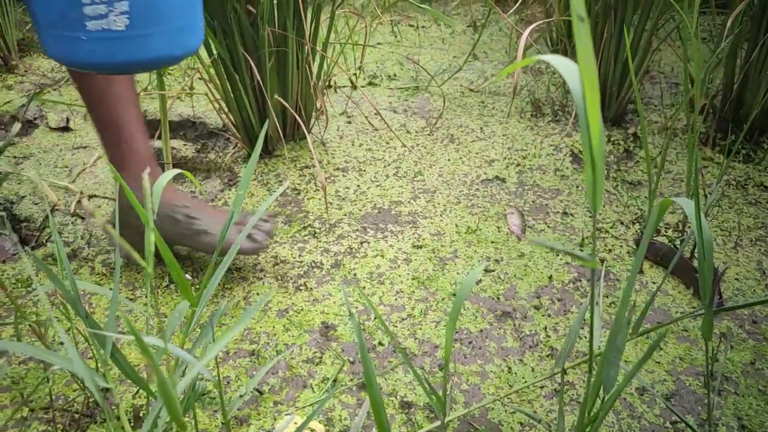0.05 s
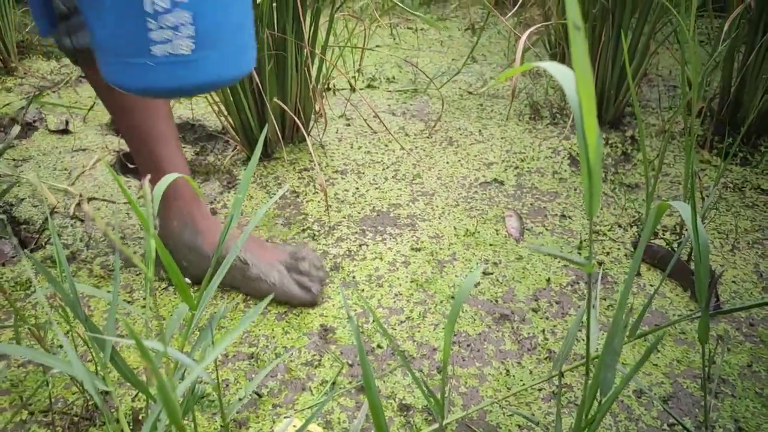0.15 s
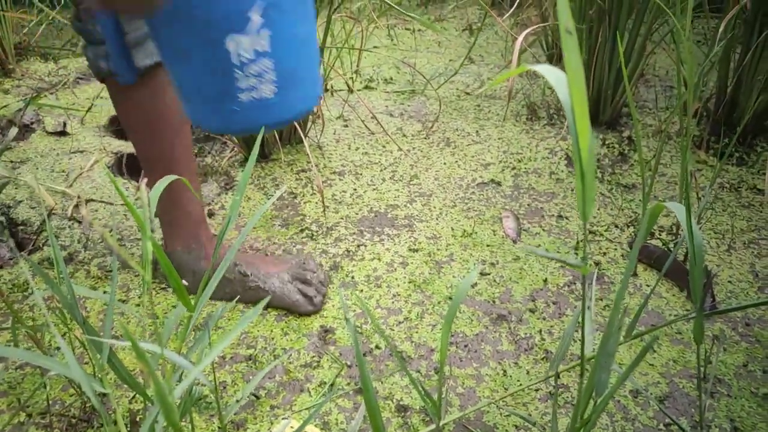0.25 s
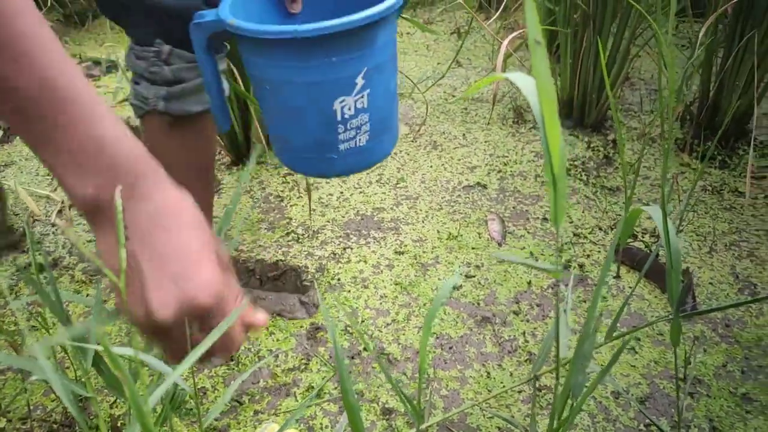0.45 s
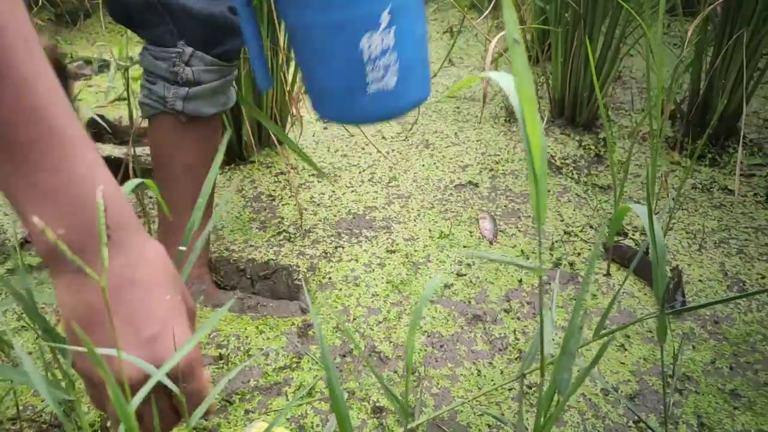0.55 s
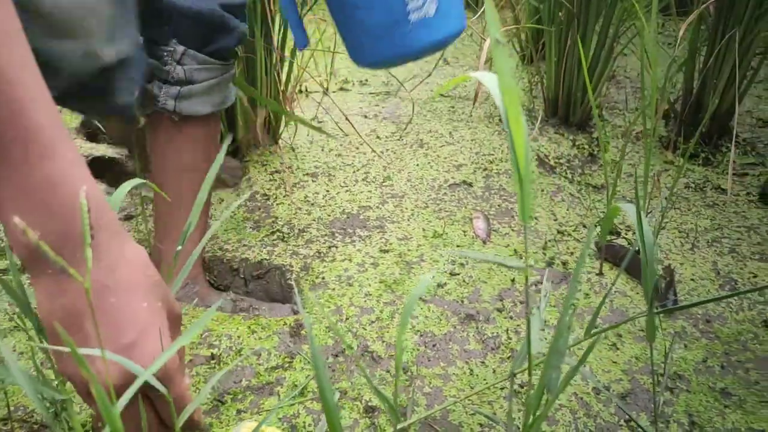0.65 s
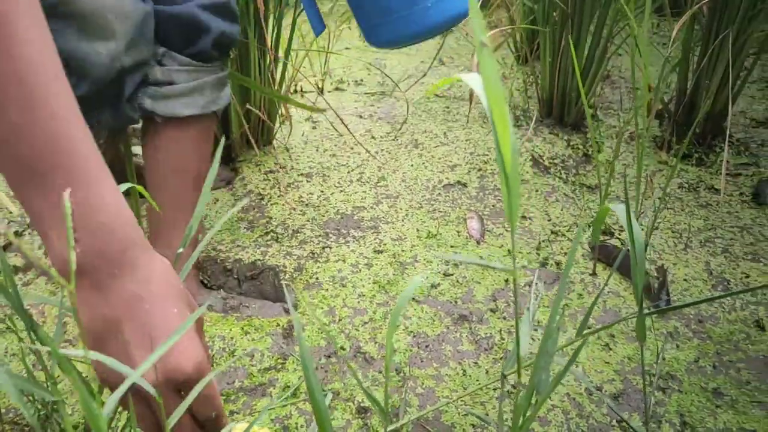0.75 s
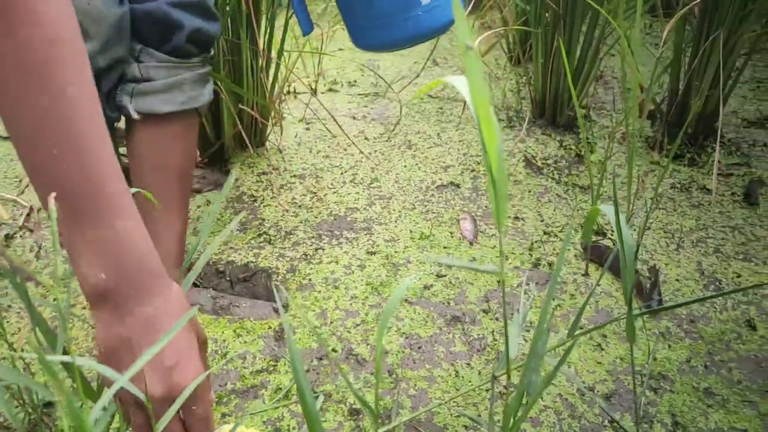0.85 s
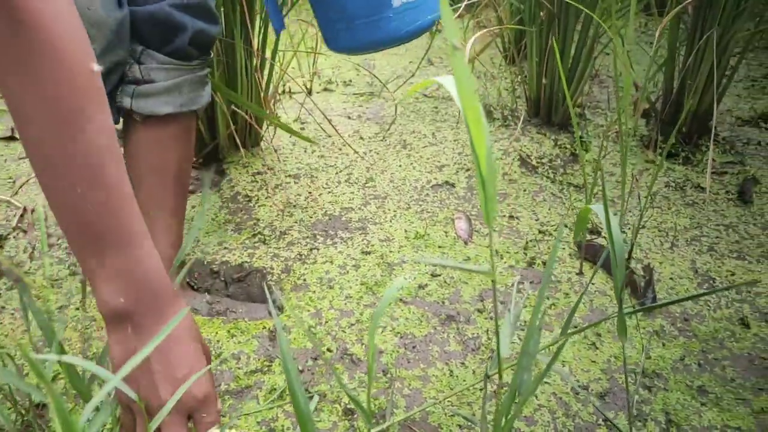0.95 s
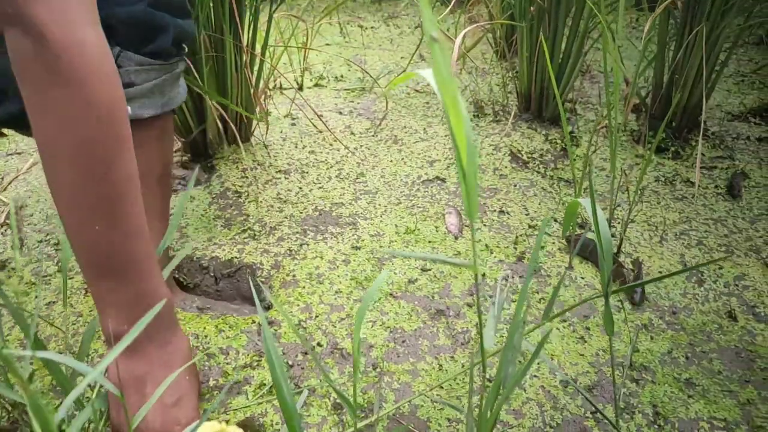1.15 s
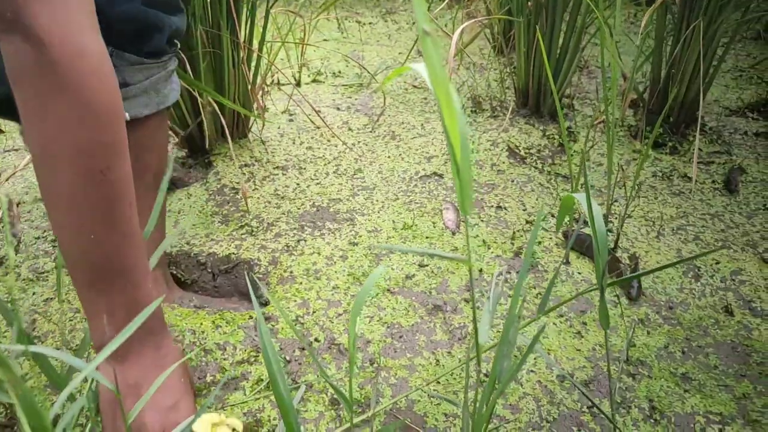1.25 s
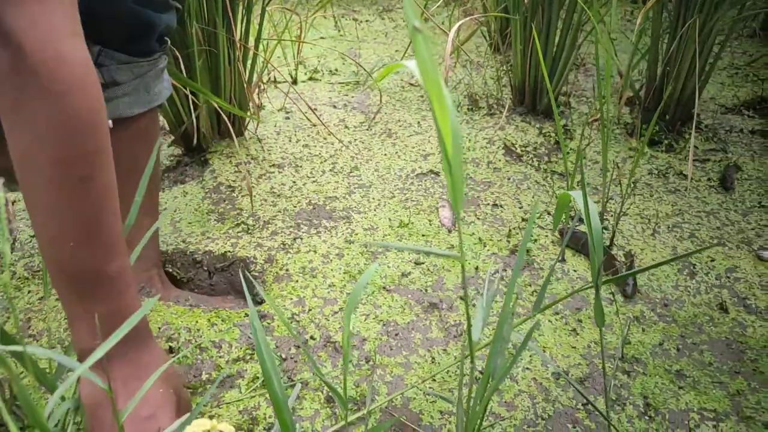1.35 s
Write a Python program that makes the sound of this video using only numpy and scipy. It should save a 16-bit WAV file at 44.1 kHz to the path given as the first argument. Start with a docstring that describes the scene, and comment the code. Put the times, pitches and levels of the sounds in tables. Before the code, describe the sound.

Wet, crackly squelches sound close by as someone steps through marsh mud and weed. A plastic bucket knocks once, then come small plops and a sharp snap of stalks, followed by softer crackles. An insect chirps faintly outdoors.

```python
"""A low rumble of air and a faint hiss open the scene, with an insect chirping steadily over them.
Someone wades barefoot through a weedy marsh with a plastic bucket and reaches down among the reeds.
Wet weed crackles as tiny bubbles burst, and stalks snap under foot and hand. The bucket is knocked
once and rings, air pockets plop in the mud, and the soft ground thuds under the wader's weight."""
import sys
import numpy as np
from scipy import signal
from scipy.fft import rfft, irfft
from scipy.io import wavfile

SR = 44100
rng = np.random.default_rng(int(sys.argv[2]) if len(sys.argv) > 2 else 0)


def transcribe(signal):
    """Save signal, clipped to [-1, 1], as a 16-bit WAV file at the path in sys.argv[1]."""
    frames = np.atleast_2d(signal).T
    limited = np.clip(frames, -1, 1)
    pcm = np.round(limited * 32767).astype(np.int16)
    wavfile.write(sys.argv[1], SR, pcm)


N = 61739
T = np.arange(N) / SR


def from_db(db):
    """Turn decibels into a number to multiply a sound by."""
    return 10 ** (np.asarray(db) / 20)


def unit_level(sound):
    """Scale a sound so that its average (RMS) level is 1."""
    return sound / np.sqrt(np.mean(sound ** 2) + 1e-20)


def band_noise(edges_hz, order=3):
    """Noise between a low and a high frequency, at level 1."""
    band = signal.butter(order, edges_hz, "band", fs=SR, output="sos")
    return unit_level(signal.sosfilt(band, rng.standard_normal(N)))


def shaped_noise(shape):
    """Noise at level 1, made stronger or weaker at each frequency as the shape says."""
    hz, db = np.transpose(shape)
    all_hz = np.maximum(np.fft.rfftfreq(N, 1 / SR), 1)
    gains = from_db(np.interp(np.log(all_hz), np.log(hz), db))
    return unit_level(irfft(rfft(rng.standard_normal(N)) * gains, N))


def burst(start, rise_s, fade_s):
    """A loudness curve that swells quickly and dies away, dropping 60 dB in the fade time."""
    age = np.maximum(T - start, 0)
    swell = 1 - np.exp(-(age / rise_s) ** 2)
    return swell * np.exp(-np.minimum(np.log(1000) * age / fade_s, 100))


def ring(start, hz, rise_s, fade_s):
    """One pure note that swells and dies away."""
    return burst(start, rise_s, fade_s) * np.sin(2 * np.pi * hz * (T - start))


# The tone of the air's rumble and of its hiss: (frequency [Hz], relative level [dB])
RUMBLE_SHAPE = [(15, -13.5), (25, 3), (45, -10.5), (65, -4.5), (90, -1), (120, -9.5), (170, -14.5),
                (260, -24.5), (400, -32), (800, -61)]
HISS_SHAPE = [(150, -14), (400, 7.5), (950, 7), (1700, -9), (2500, 4.5), (3300, -5), (5400, -2), (6900, 2),
              (7600, 8), (8300, -6.5)]

def air():
    """The air over the open marsh makes a steady low rumble and a faint hiss."""
    return from_db(-52.5) * shaped_noise(RUMBLE_SHAPE) + from_db(-68) * shaped_noise(HISS_SHAPE)


# How loud the wet weed crackles as time goes by: (time [s], level [dB])
CRACKLE_LEVELS = [(0, -70.5), (.19, -74.5), (.24, -65), (.45, -62), (.50, -56), (.55, -59.5), (.63, -63),
                  (.78, -62.5), (.86, -66.5), (1.0, -71.5), (1.15, -69), (1.30, -69), (1.35, -64.5),
                  (1.4, -71)]

def weed_crackle(pops_per_s=5000, fade_cycles=8, boost_db_per_octave=1.5):
    """Tiny bubbles and films of water burst at random in the stirred weed, each with a very short note."""
    sizes = from_db(0.5 * np.minimum(rng.exponential(1, N), 4)) * rng.choice([-1, 1], N)
    clicks = sizes * (rng.random(N) < pops_per_s / SR)
    pitches_hz = np.geomspace(453, 7200, 24)
    pitch_choice = rng.integers(0, len(pitches_hz), N)
    crackle = np.zeros(N)
    for k, hz in enumerate(pitches_hz):
        step = 2 * np.pi * hz / SR
        decay = np.exp(-np.log(1000) * hz / (fade_cycles * SR))
        # this filter turns each click into a short fading note
        feedback = [1, -2 * decay * np.cos(step), decay * decay]
        pops = signal.lfilter([0, np.sin(step)], feedback, clicks * (pitch_choice == k) + 1e-18)
        crackle += from_db(boost_db_per_octave * np.log2(hz / pitches_hz[0])) * unit_level(pops)
    level_db = np.interp(T, *np.transpose(CRACKLE_LEVELS))
    return unit_level(crackle) * from_db(level_db)


# When each of the insect's chirps begins: (time [s])
CHIRP_STARTS = [0.027, 0.122, 0.206, 0.291, 0.386, 0.476, 0.561, 0.648, 0.741, 0.829, 0.927, 1.013, 1.112,
                1.196, 1.286, 1.375]

def insect(chirp_s=0.044, ramp_s=0.008):
    """An insect repeats a thin, high chirp about eleven times a second."""
    on_off = sum(np.clip(np.minimum(T - start, start + chirp_s - T) / ramp_s, 0, 1)
                 for start in CHIRP_STARTS)
    note = band_noise((7530, 7770), order=2)  # so narrow that it sounds like one pitch
    faint_upper_band = from_db(-10) * band_noise((7500, 8500))  # a faint high hiss with each chirp
    return from_db(-62.5) * on_off * (note + faint_upper_band)


# Wet stalks snapping: (time [s], fade time [s], low noise level [dB], middle noise level [dB],
# high noise level [dB], ring pitch [Hz], ring level [dB])
STALK_SNAPS = [(.0885, 0.012, -66, -56.5, -52, 6000, -60), (.3080, 0.018, -74, -57, -71, 6900, -50),
               (.3730, 0.016, -52.5, -76, -72, 2670, -51), (0.4585, 0.0045, -68, -58, -34.5, 2700, -45),
               (0.4648, 0.0095, -33.5, -53, -32, 2670, -25.5), (.4672, 0.019, -61, -54, -61, 2126, -30),
               (0.4699, 0.045, -36.5, -44.5, -48, 2834, -32.5),
               (0.4735, 0.0087, -30, -40, -33, 6910, -15.5), (0.4784, .013, -29.5, -32, -34.5, 6700, -29),
               (.4845, 0.016, -42, -40.5, -38, 2680, -45), (0.4888, 0.011, -59, -38, -54, 7000, -31),
               (.5335, 0.023, -68, -51, -49.5, 6920, -46), (.5365, 0.009, -51, -65, -69, 2140, -46),
               (.5720, 0.046, -52, -45.5, -49.5, 6080, -47), (0.5781, 0.011, -72, -40.5, -50, 2780, -38),
               (.6170, 0.011, -51.5, -53, -53, 2200, -53), (.6945, 0.02, -50.5, -49, -50.5, 2900, -56),
               (.7560, 0.094, -50, -76, -63, 2520, -58), (.7625, 0.046, -64, -51.5, -65, 3520, -57),
               (0.7957, 0.017, -45.5, -49, -55, 2126, -42), (.7986, 0.012, -43, -46, -53, 3440, -45),
               (.8000, 0.013, -56, -42, -48, 4800, -37), (.8020, 0.025, -60, -56, -73, 4250, -40),
               (0.807, 0.03, -59, -52, -64, 3860, -58), (.9432, 0.0051, -40, -48, -70, 1700, -33),
               (1.100, 0.012, -71, -55, -55, 6740, -47.5), (1.1930, 0.021, -79, -63, -56, 7160, -52.5),
               (1.2200, 0.042, -80, -63, -58, 6900, -56), (1.3150, 0.031, -57, -58, -78, 2820, -50.5),
               (1.3249, 0.0077, -49.5, -36.5, -58, 2950, -31), (1.3266, 0.0074, -56, -56, -70, 3580, -40.5),
               (1.3281, 0.04, -66, -49, -69, 2350, -60), (1.3450, 0.033, -52, -56.5, -58, 5000, -53.5)]

def stalk_snaps():
    """Each stalk tears with a short burst of noise and rings briefly at its own pitch."""
    treble_cut = signal.butter(8, 7630, fs=SR, output="sos")
    low, middle, high = [signal.sosfilt(treble_cut, band_noise(edges_hz))
                         for edges_hz in ((370, 1250), (1980, 5000), (5100, 7310))]
    snaps = np.zeros(N)
    for start, fade_s, low_db, middle_db, high_db, hz, ring_db in STALK_SNAPS:
        tear = from_db(low_db) * low + from_db(middle_db) * middle + from_db(high_db) * high
        snaps += tear * burst(start, rise_s=0.0003, fade_s=fade_s)
        snaps += from_db(ring_db) * ring(start, hz, rise_s=0.0004, fade_s=fade_s)
    return snaps


# The notes the plastic bucket rings with: (pitch [Hz], relative level [dB], fade time [s])
BUCKET_NOTES = [(370.6, -2, 0.089), (431, 0, 0.041), (573, -3, 0.07), (781, -16.5, 0.054),
                (970, -18.5, 0.048), (1395, -7, 0.019), (1560, -12, 0.027), (2034, -30, 0.035),
                (2127, -24, 0.033), (2360, -31, 0.074), (2920, -20, .016), (3520, -25.5, 0.024),
                (4070, -26.5, 0.02)]

def bucket_knock(start=0.2219):
    """One quick knock makes a small crack and sets the bucket's plastic walls ringing."""
    lowest_hz = BUCKET_NOTES[0][0]
    walls = np.zeros(N)
    for k, (hz, db, fade_s) in enumerate(BUCKET_NOTES):
        rise_s = 0.003 * lowest_hz / hz  # low notes swell last
        direction = (-1) ** k  # every other note swings the opposite way
        walls += direction * from_db(db) * ring(start, hz, rise_s, fade_s)
    crack = band_noise((1200, 6800), order=2) * burst(start, rise_s=0.00024, fade_s=0.027)
    return from_db(-18) * walls + from_db(-42) * crack


# Air pockets opening in the mud:
# (time [s], pitch [Hz], level [dB], fade time [s], overtone level compared with the note [dB])
MUD_PLOPS = [(0.3074, 527, -21, 0.025, -3), (.3185, 547, -44.5, 0.091, 2.5),
             (.3305, 532, -34.5, 0.034, -12), (.3990, 415, -47, .025, -8), (0.4732, 463, -37.5, 0.045, -1),
             (.5553, 494, -30, 0.028, -37), (.7105, 786, -49, 0.016, -1), (.7305, 527, -43.5, 0.05, -7),
             (.7470, 584, -48, 0.033, -10), (.7972, 1050, -31.5, 0.014, -7.5), (.9425, 986, -37, .005, -6)]

def mud_plops():
    """Each air pocket opens with a hollow note and a brief overtone, nearly an octave higher."""
    plops = np.zeros(N)
    for start, hz, db, fade_s, overtone_db in MUD_PLOPS:
        note = ring(start, hz, rise_s=0.0012, fade_s=fade_s)
        overtone = ring(start, hz * 1.955, rise_s=0.00076, fade_s=0.012)
        plops += from_db(db) * (note + from_db(overtone_db) * overtone)
    return plops


# Pushes on the soft ground: (time [s], pitch [Hz], level [dB], fade time [s])
GROUND_THUDS = [(0.4704, 204, -23, 0.048), (0.475, 86, -33.5, 0.091), (0.7614, 119, -42.5, 0.11),
                (0.798, 141, -36, 0.046)]

def ground_thuds():
    """Soft ground gives way under the wader's weight with low notes that die quickly."""
    return sum(from_db(db) * ring(start, hz, rise_s=0.0016, fade_s=fade_s)
               for start, hz, db, fade_s in GROUND_THUDS)


def scene():
    """All the sounds add up at one close microphone."""
    wading = bucket_knock() + mud_plops() + stalk_snaps() + ground_thuds() + weed_crackle()
    return (wading + insect() + air())[None]


def record(dry):
    """The microphone loses the high treble; the recorder adds a trace of hiss and cuts the very top."""
    microphone_cut = signal.cheby2(14, 55, 8900, fs=SR, output="sos")
    recorder_cut = signal.cheby2(12, 40, 15800, fs=SR, output="sos")
    hiss = from_db(-90.5) * rng.standard_normal(N)
    return signal.sosfilt(recorder_cut, signal.sosfilt(microphone_cut, dry) + hiss)


dry = scene()
out = record(dry)
transcribe(out)
```